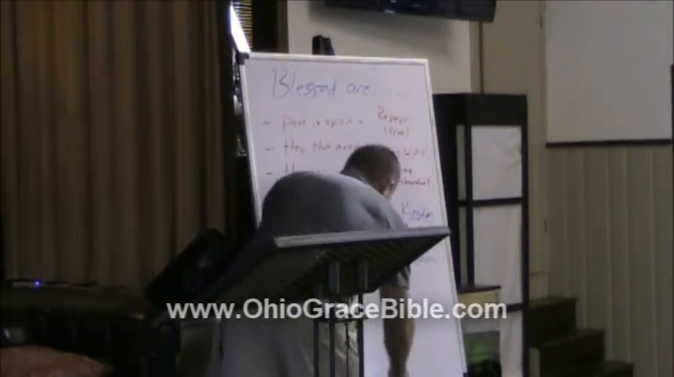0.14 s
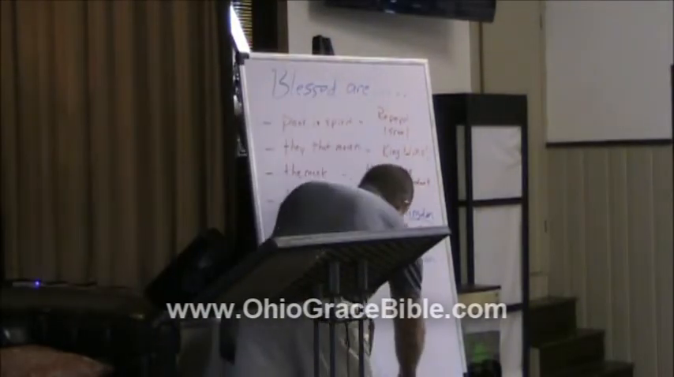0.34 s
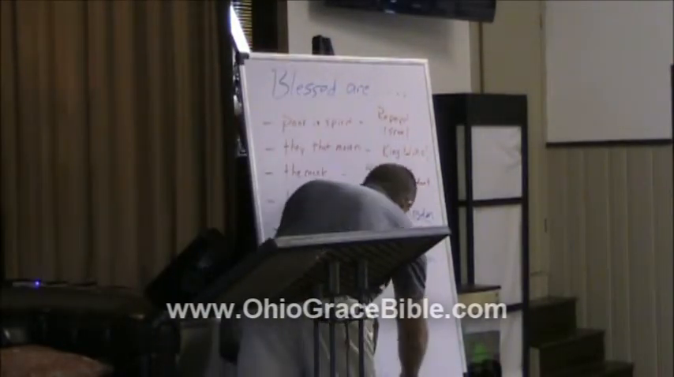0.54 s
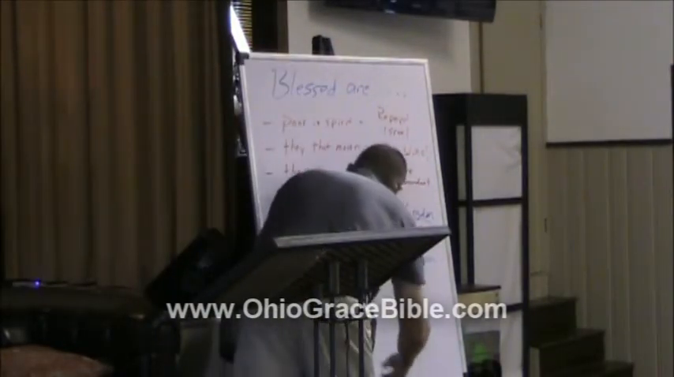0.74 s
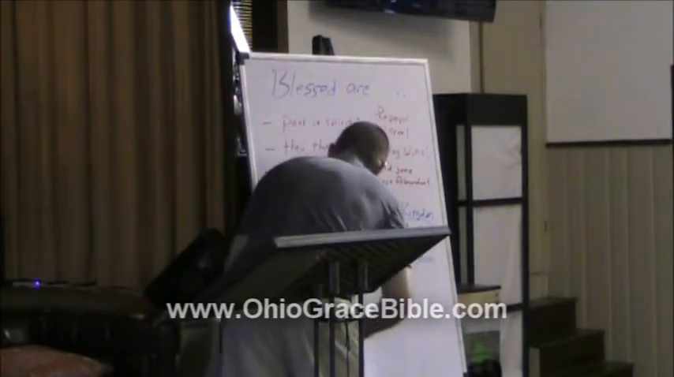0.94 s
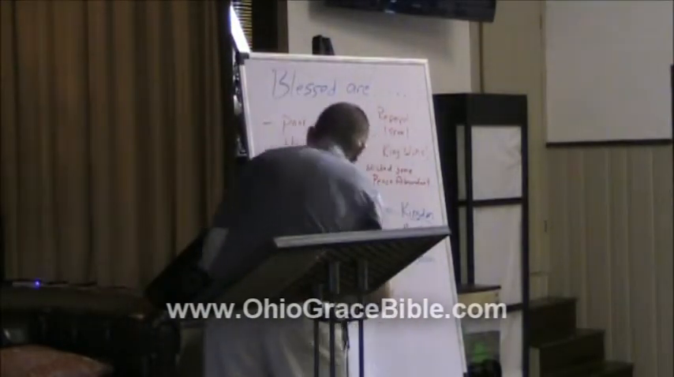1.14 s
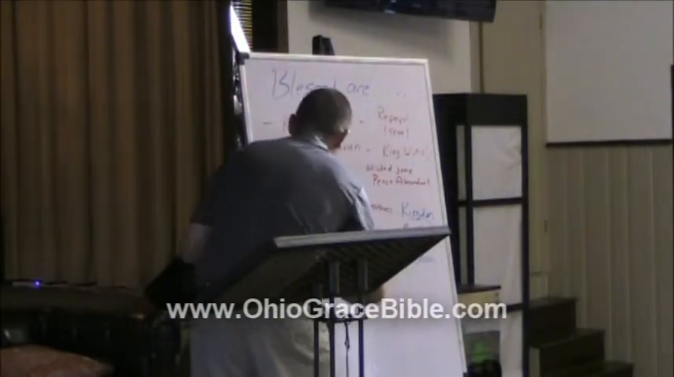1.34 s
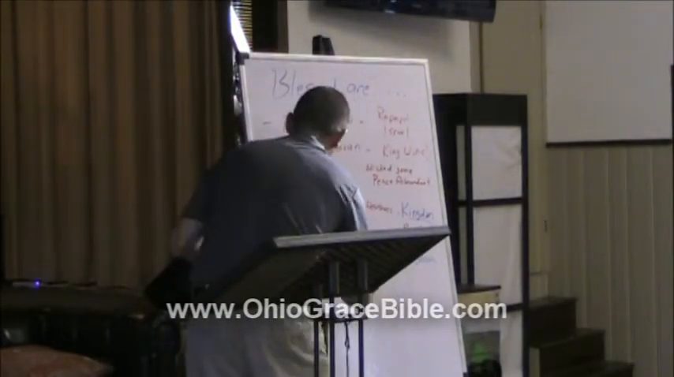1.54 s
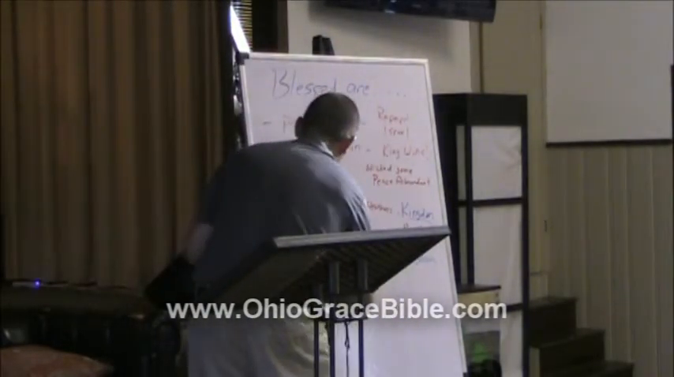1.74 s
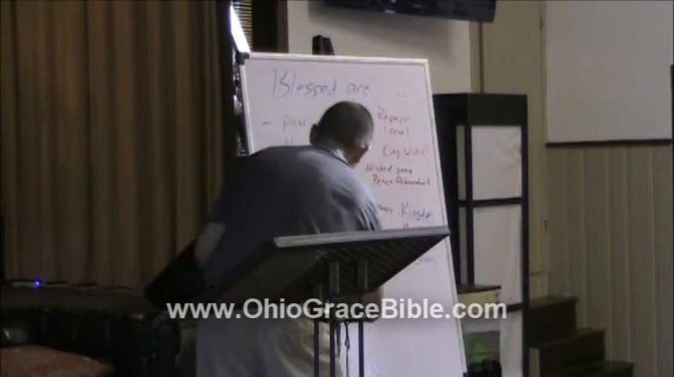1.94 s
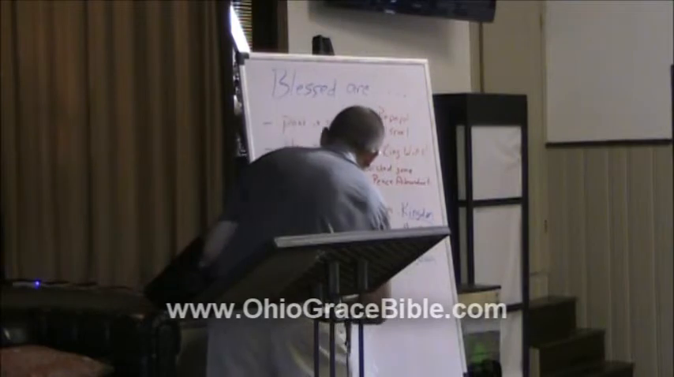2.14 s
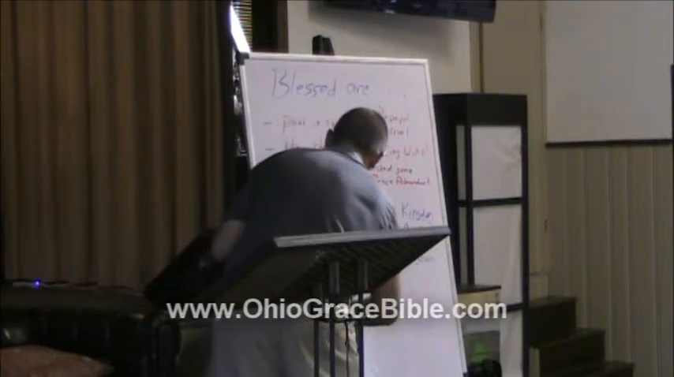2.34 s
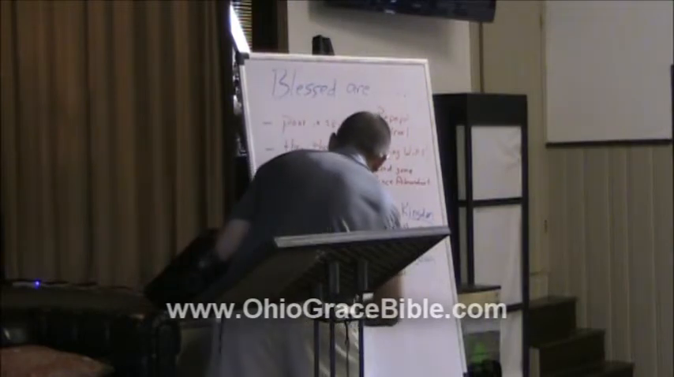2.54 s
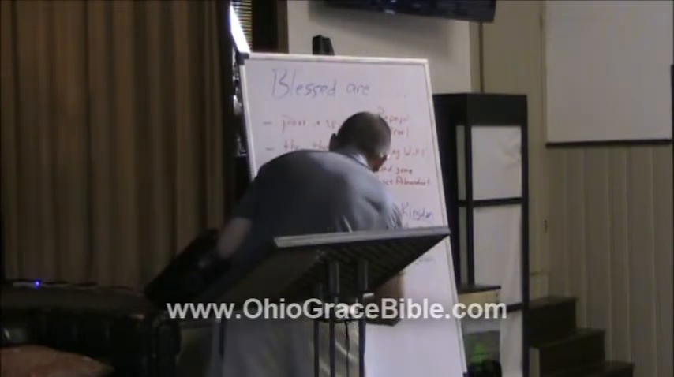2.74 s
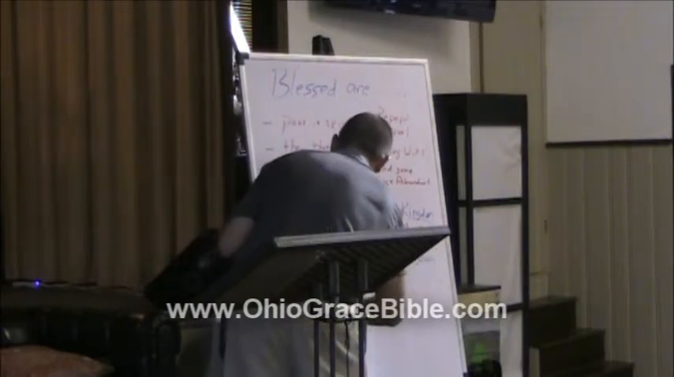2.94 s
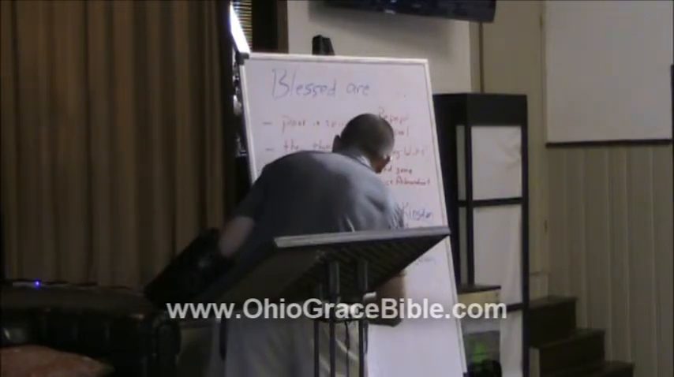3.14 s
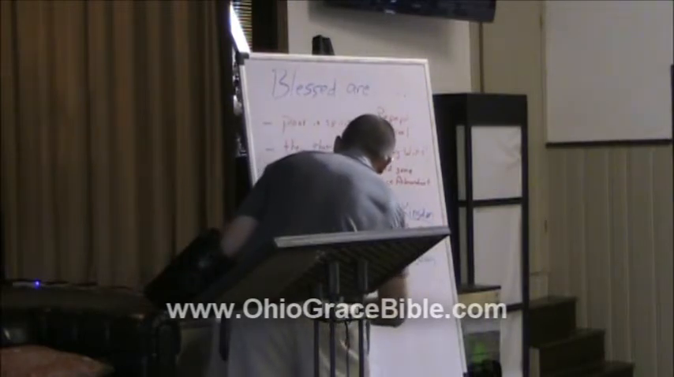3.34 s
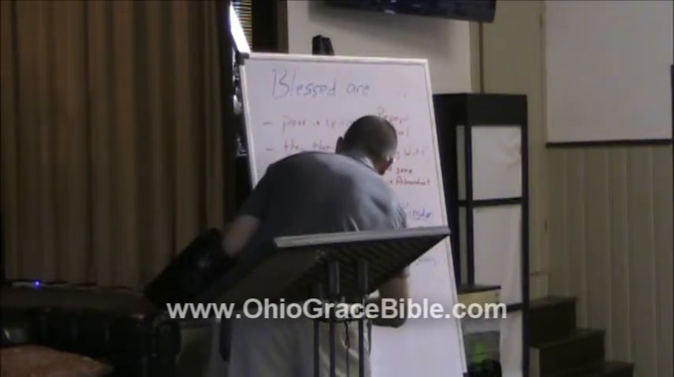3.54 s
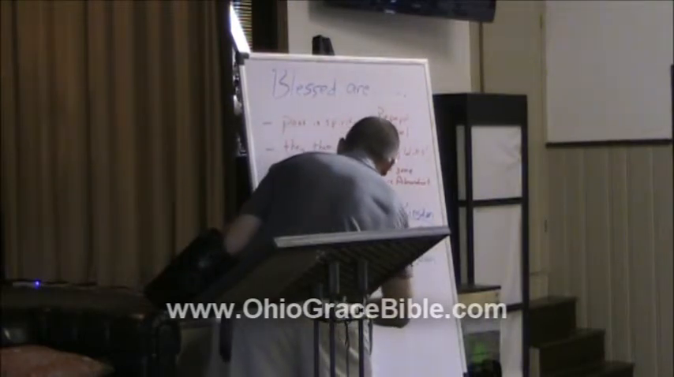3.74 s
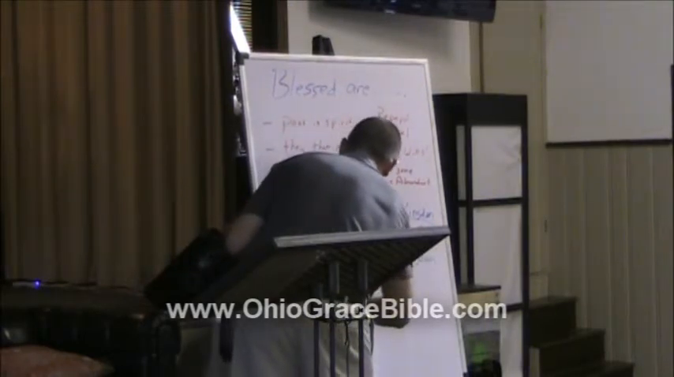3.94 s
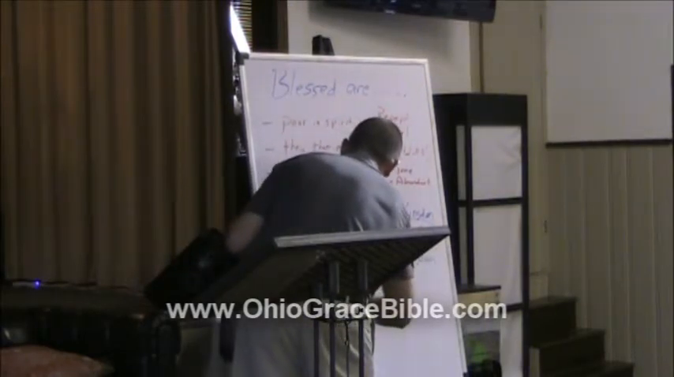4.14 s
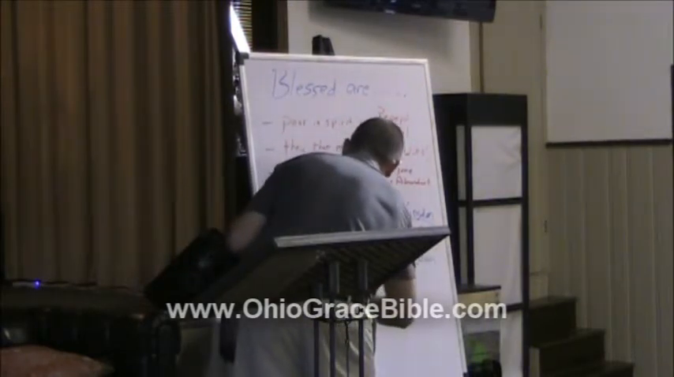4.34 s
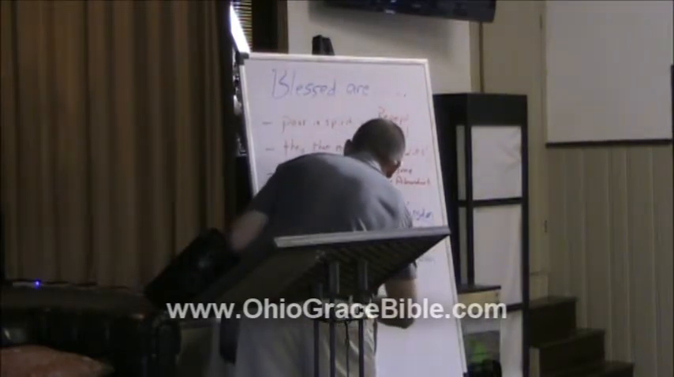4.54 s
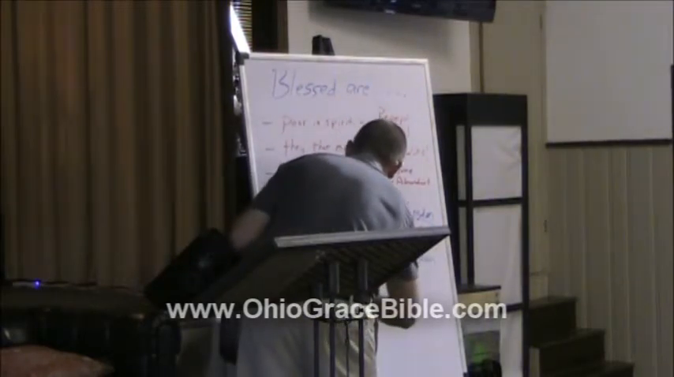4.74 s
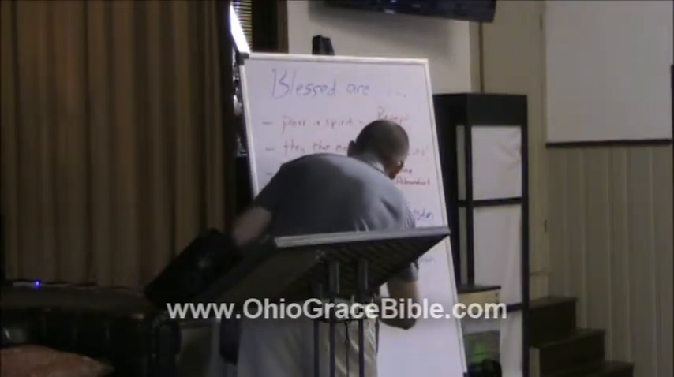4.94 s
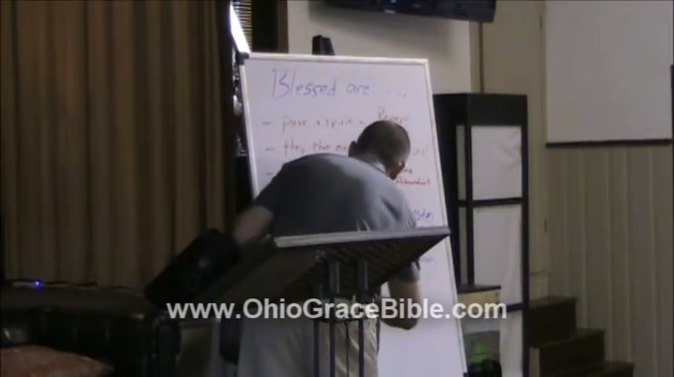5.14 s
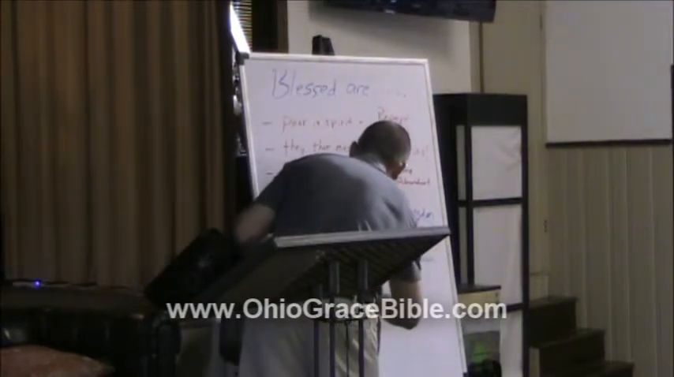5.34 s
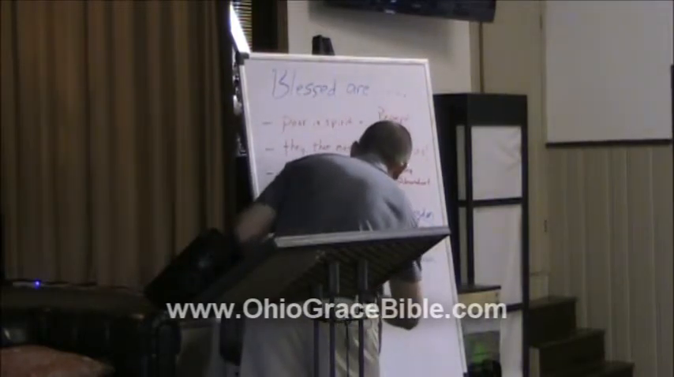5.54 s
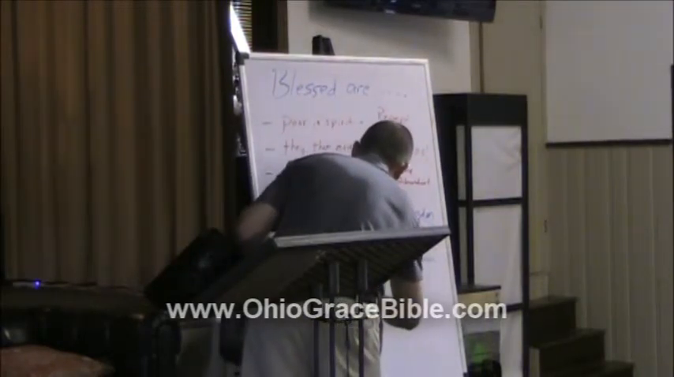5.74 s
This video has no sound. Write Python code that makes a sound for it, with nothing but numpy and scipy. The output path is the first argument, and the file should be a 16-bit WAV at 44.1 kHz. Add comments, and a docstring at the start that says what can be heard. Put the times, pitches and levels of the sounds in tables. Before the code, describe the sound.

A quiet hall with steady, low ventilation rumble and slight hiss, heard through a clip-on microphone close to the writer. At once a very faint, high whistle turns into a dry, bright rasp as a marker finishes a line, peaking around 0.15 s, with a small low microphone bump. Two hard, woody knocks hit the whiteboard at 0.2 and 0.35 s; at 0.45-0.5 s the marker clatters into the tray in a quick cluster, the easel humming briefly and the room answering. A tiny tick comes at 0.85 s, a crisp plastic cap snap at 1.35-1.4 s, then a short rubbing slide near 1.6 s. Lighter raps fall at 2.05 and 2.3 s. From then on writing proceeds: soft dull thumps at about 2.5, 2.8, 3.5, 4.1, 4.5, 5.0 and 5.4 s, the strongest at 5.6 s, among thin, very quiet felt hisses with a faint squeaky edge.

```python
"""In a quiet hall, someone at a whiteboard on an easel is heard from a clip-on microphone.
A marker whistles and rasps along a line by stick-slip, knocks on the board and clatters into the tray:
impacts excite the modes of board and frame. Close by, another is picked up with a tick, its cap snaps off
and slides on the back. Then letters are written: the felt tip lands with soft thumps and hisses by friction.
Ventilation and hum lie beneath; close reflections and a diffuse tail give the space."""
import sys
import numpy as np
from scipy import signal
from scipy.fft import rfft, irfft
from scipy.io import wavfile

SR = 44100
rng = np.random.default_rng(int(sys.argv[2]) if len(sys.argv) > 2 else 0)


def bounce(signal):
    """Save signal as a 16-bit WAV file at the path given by the first command-line argument."""
    frames = np.transpose(np.atleast_2d(signal))
    limited = np.clip(frames, -1, 1)
    pcm = np.round(limited * 32767).astype(np.int16)
    wavfile.write(sys.argv[1], SR, pcm)


N = 259352

# steady background colour: (frequency [Hz], relative level [dB])
FLOOR_COLOUR = [(15, -63), (25, -13), (49, -4), (69, -1.5), (82, -7.5), (119, -2.5), (209, -4), (240, -0.5),
                (495, -7.5), (537, -8), (631, -6.5), (782, -11.5), (1050, -13), (1710, -17.5),
                (15500, -22.5)]
# mains hum and a screen's whine: (frequency [Hz], level [dB])
HUM = [(59.5, -71.5), (120, -77), (15734, -88)]
# rasp of the long line: (frequency [Hz], relative level [dB])
LINE_COLOUR = [(500, -46), (1400, -2), (2000, -3), (3000, -1), (4400, -5.5), (6300, 1.5), (7600, 1),
               (9700, -4.5), (11100, -0.5), (13000, -8), (16000, -1)]
# the nib whistles before it bites: (time [s], pitch [Hz])
WHISTLE = [(0, 9950), (.028, 10650), (.052, 10350), (.062, 9150), (.082, 8750), (.11, 9300)]
# diffuse tail: (band centre [Hz], decay by 60 dB [s], level before weighting by bandwidth [dB])
HALL = [(148, 0.3, 4.5), (284, 0.56, 1.5), (615, 0.5, -16), (1130, 0.91, -9), (2160, 0.77, -11.5),
        (4200, 0.22, -10), (8000, 0.25, -10)]
# hard raps on the board: (time [s], thud peak [dB], crack gain before colouring [dB])
KNOCKS = [(.2160, -26.5, -33.5), (0.3478, -26, -31), (2.0685, -29, -37.5), (2.2964, -28.5, -39.5)]
# a marker clatters into the tray:
# (time [s], thud peak [dB], contact hardness as low-pass corner [Hz], crack gain before colouring [dB])
TRAY = [(.4520, -21.5, 2640, -32.5), (.4768, -30.5, 880, -23.5), (.4795, -29, 514, -39),
        (.4882, -20.5, 1200, -24.5), (.5110, -22, 396, -18)]
# modes of the board: (frequency [Hz], width [Hz], relative level [dB])
BOARD = [(150, 130, -5), (346, 204, 0), (558, 220, 2.5), (811, 120, 5), (1010, 80, 4), (1194, 380, -1.5),
         (1610, 240, -1), (1777, 180, -0.5), (2170, 175, -1.5), (2410, 66, -3.5), (2610, 170, -2.5),
         (3190, 73, 2), (4100, 600, -10.5)]
# modes of the easel's frame, which drone on: (frequency [Hz], width [Hz], gain [dB])
EASEL = [(132, 6.4, 3.5), (164.2, 6.1, 5), (232.3, 3.8, 4.5), (274.4, 11, 6.5), (342, 18, -0.5),
         (382, 6.9, -8), (554, 16, -7), (675, 9.2, 1)]
# reflections from frame, writer and floor: (delay [s], signed share [ratio])
ECHOES = [(.0021, 0.16), (.0046, .25), (.0075, -.25), (0.0101, .2), (0.0137, .13)]
# small plastic clicks: (time [s], gain [dB], ring frequency [Hz], ring width [Hz],
# broad snap relative to the ring [dB], lower edge of the snap [Hz])
CLICKS = [(0.8427, -42.5, 870, 128, -33, 495), (1.3423, -26.5, 8600, 800, 1, 3040),
          (1.3510, -34.5, 8900, 905, 5.5, 3020), (1.4126, -25, 2330, 417, 14, 90)]
# colour of the snap: (frequency [Hz], relative level [dB])
SNAP_COLOUR = [(60, 0), (200, 0), (700, 0), (1200, 3.5), (1700, -1.5), (2400, -1), (3100, -6), (3900, 3),
               (5000, -17), (6800, -7.5), (8600, -5), (11500, -16), (16000, -16.5)]
# short rings in the scrape of each click: (frequency [Hz], width [Hz], relative level [dB])
SCRAPE_RINGS = [(1220, 510, -5), (2500, 260, 0), (3600, 550, -8.5), (8950, 1200, -7.5)]
# the cap is pushed on, one long slide with a shove in it: (middle [s], length [s], level [dB])
SLIDE = [(1.578, 0.17, -55.5), (1.607, 0.027, -54)]
# resonances of the hollow cap: (frequency [Hz], width [Hz], relative level [dB])
CAP_HOLLOW = [(1500, 400, -3.5), (2920, 800, -1), (5920, 530, 4), (8360, 860, -6), (11200, 1100, -2.5)]
# the felt tip lands: (time [s], peak level [dB], quickness of the push [Hz])
LANDINGS = [(2.0439, -33, 340), (2.5274, -25, 327), (2.7782, -33, 260), (3.4666, -31.5, 363),
            (3.8849, -40, 238), (4.1270, -34.5, 209), (4.4666, -32, 244), (5.0085, -29, 376),
            (5.3987, -28.5, 360), (5.5998, -21, 480)]
# firm pen strokes: (middle [s], length [s], hiss level [dB])
STROKES = [(2.091, 0.096, -63), (2.548, .05, -59.5), (2.844, 0.1, -60.5), (3.172, .06, -59),
           (3.28, 0.091, -65), (3.393, 0.03, -68), (3.625, .062, -65), (3.71, .05, -67), (4.03, 0.022, -64),
           (4.216, 0.13, -66.5), (4.42, 0.031, -64.5), (4.496, 0.051, -66.5), (4.605, 0.06, -66),
           (4.687, 0.056, -65.5), (4.767, 0.038, -61.5), (4.838, .07, -67.5), (5.166, .05, -66.5),
           (5.44, .079, -69)]
# the tip's tone drifts along the word:
# (time [s], nib resonance [Hz], nib width [Hz], squeak [Hz], squeak over the hiss [dB])
PEN = [(2.1, 7400, 3000, 11000, -6), (2.7, 6450, 2400, 11000, -7.5), (3.3, 6450, 2760, 10900, -1),
       (4.2, 5530, 5000, 11300, 1), (4.7, 5470, 4600, 10200, 0), (5.5, 5500, 4500, 10400, 3)]
# sends into the easel's frame: (raps [dB], tray [dB], felt tip [dB])
DRONE_DB = (-9.5, 7.5, -8.5)
# sends into the hall: (raps [dB], tray [dB], felt tip [dB], cracks [dB], clicks and cap [dB], rubbing [dB])
HALL_SEND_DB = (9.5, -1.5, -8, -5, -11.5, -21)

T = np.arange(N) / SR
BLOW = 8192  # samples computed for one short sound
QUIET = 1e-18  # tiny offset into the filters
FLOOR_DB = -56
TOP_HZ = 15850
KNOCK_HZ = 1450  # contact hardness of every rap

# a long line: the pen bites, rasps at full speed, then eases off and trails away
LINE_START_S, LINE_ATTACK_S, LINE_HOLD_S, LINE_RELEASE_S = 0.086, 0.067, 0.008, 0.088
LINE_DB = -46.5
TRAIL_S, TRAIL_DB = 0.63, -58.5  # light rubbing under it: half held, half fading
WHISTLE_DB, WHISTLE_FADE_DB_PER_S = -64, 40
WHISTLE_WOBBLE = 0.016  # share of the pitch

# a landing: the hand's weight follows the tip, the panel rings, and the barrel ticks as the stroke sets off
HAND_DB, HAND_HZ, HAND_LAG_S = -8.5, 151, 0.0002
PANEL_HZ, PANEL_WIDTH_HZ, PANEL_DB = 293, 76, -8
TICK_AFTER_S, TICK_S, TICK_HZ, TICK_WIDTH_HZ, TICK_DB = 0.0351, 0.0089, 1400, 1340, -59

# faint joining strokes fill the writing at the hand's own pace
WRITING_S, JOINS_PER_S = (2.9, 5.85), 6
JOIN_S, JOIN_DB, JOIN_SCATTER_DB = 0.06, -70.5, 0.5
SQUEAK_WIDTH_HZ = 3500  # of each of two resonances in cascade


def undb(db):
    """Logarithmic law: decibels to amplitude gain."""
    return 10 ** (np.asarray(db) / 20)


def level(x, db=0):
    """Mean power sets the level: scale to an rms value."""
    return x * undb(db) / np.sqrt(np.mean(x ** 2))


def peak(x, db=0):
    """Greatest excursion sets the level: scale to a peak value."""
    return x * undb(db) / np.abs(x).max()


def add(out, s, x):
    """Superposition: add a short sound at time s."""
    i = max(int(s * SR), 0)
    out[i:i + len(x)] += x[:max(N - i, 0)]


def mix(sounds, dbs):
    """Superposition of sounds, each with its own gain."""
    return sum(undb(db) * x for x, db in zip(sounds, dbs))


def band(x, hz, width):
    """Damped resonance: a single mode with gain 1 at its centre."""
    quality = hz / min(width, SR / 4)
    b, a = signal.iirpeak(min(hz, .45 * SR), quality, SR)
    return signal.lfilter(b, a, x + QUIET)


def ring(x, modes):
    """Modal superposition: neighbouring resonances swing in opposite directions."""
    return sum((-1) ** k * undb(db) * band(x, hz, width) for k, (hz, width, db) in enumerate(modes))


def soften(x, hz, order=2):
    """Low-pass filtering: attenuate what lies above the corner."""
    b, a = signal.butter(order, min(hz, .45 * SR), fs=SR)
    return signal.lfilter(b, a, x + QUIET)


def thin(x, hz):
    """High-pass filtering: attenuate what lies below the corner."""
    b, a = signal.butter(2, min(hz, .45 * SR), "high", fs=SR)
    return signal.lfilter(b, a, x + QUIET)


def colour(x, points):
    """Minimum-phase filtering: a causal response with the given (frequency [Hz], level [dB]) outline."""
    hz, db = np.transpose(points)
    bins = np.maximum(np.arange(BLOW // 2 + 1) * SR / BLOW, 1)
    outline_db = np.interp(np.log(bins), np.log(hz), db)
    cepstrum = irfft(np.log(undb(outline_db)))
    # fold the cepstrum onto positive times, which makes the response causal
    cepstrum[1:BLOW // 2] *= 2
    cepstrum[BLOW // 2 + 1:] = 0
    response = irfft(np.exp(rfft(cepstrum)))
    return signal.fftconvolve(x, response)[:len(x)]


def walk(rate, n=N):
    """Random modulation: normal draws, rate per second, joined by straight lines."""
    at = np.arange(n) * rate / SR
    knots = rng.standard_normal(n // 8)
    return np.interp(at, np.arange(len(knots)), knots)


def friction(n, grain_db=3, catch_db=0.5):
    """Dry friction: dense micro-slips of uneven size, in spurts as the surface catches."""
    unevenness_db = grain_db * walk(2500, n) + catch_db * walk(130, n)
    return level(rng.standard_normal(n) * undb(unevenness_db))


def swell(t, length):
    """Hand kinematics: a movement speeds up and slows down around t = 0."""
    return np.exp(-3.2 * (t / length) ** 2)  # 45 percent at half a length from the middle


def envelope(start, attack, hold, release):
    """Piecewise-linear amplitude: straight rise, hold and fall."""
    return np.interp(T, start + np.cumsum([0, attack, hold, release]), [0, 1, 1, 0])


def floor():
    """Stationary noise and pure tones: ventilation, hum and microphone hiss."""
    air = level(colour(rng.standard_normal(N), FLOOR_COLOUR), FLOOR_DB)
    hum = sum(level(np.sin(2 * np.pi * hz * T + rng.uniform(0, 2 * np.pi)), db) for hz, db in HUM)
    side_colour = [(30, 11), (120, 2.5), (500, -0.5), (3000, -2), (15000, -0.5)]
    side = level(colour(rng.standard_normal(N), side_colour), -64)
    return air + hum + side * np.array([[1], [-1]])  # opposite sign in the two channels


def long_line():
    """Stick-slip: the nib first whistles in regular slips, then breaks into a rasp."""
    times, hz = np.transpose(WHISTLE)
    pitch = np.interp(T, times, hz) * (1 + WHISTLE_WOBBLE * walk(1000))
    tone = level(np.sin(2 * np.pi * np.cumsum(pitch) / SR))
    gliding = np.clip(1 - (T - LINE_START_S) / LINE_ATTACK_S, 0, 1)
    whistle = tone * gliding * undb(WHISTLE_DB - WHISTLE_FADE_DB_PER_S * T)
    bite = undb(LINE_DB) * envelope(LINE_START_S, LINE_ATTACK_S, LINE_HOLD_S, LINE_RELEASE_S)
    trail = undb(TRAIL_DB) * envelope(-LINE_START_S, 2 * LINE_START_S, TRAIL_S / 2, TRAIL_S / 2)
    rasp = level(colour(friction(N, grain_db=3.5, catch_db=2.0), LINE_COLOUR))
    return whistle + rasp * np.hypot(bite, trail)  # powers of bite and trail add


def hall(x):
    """Reverberation: a diffuse tail builds quickly and dies soonest in the treble."""
    t, tail = T[:SR], 0
    for hz, t60, db in HALL:
        noise = level(band(band(rng.standard_normal(SR), hz, hz), hz, hz))
        fade = undb(-60 * t / t60) * (1 - np.exp(-t / 0.005))
        weight = np.sqrt(hz / SR / np.sum(fade ** 2))
        tail = tail + undb(db) * noise * fade * weight
    return signal.fftconvolve(x, tail)[:N]


def mic_bump(s=0.128, hz=55, db=-42):
    """Damped sway: the microphone moves against the shirt as the writer bends."""
    return undb(db) * np.cos(2 * np.pi * hz * (T - s)) * np.exp(-((T - s) / 0.0081) ** 2)


def knocks(rows, crack_s):
    """Impact excitation: a short push rings the board's modes while the barrel cracks; (thuds, cracks)."""
    thuds, cracks, t = np.zeros(N), np.zeros(N), T[:BLOW]
    for s, db, hard_hz, crack_db in rows:
        push = soften(signal.unit_impulse(BLOW), hard_hz, order=1)
        add(thuds, s, peak(ring(push, BOARD), db))
        chatter = rng.standard_normal(BLOW) * np.exp(-t / crack_s) * (1 - np.exp(-t / 0.0008))
        add(cracks, s, undb(crack_db) * chatter)
    crack_colour = [(100, -30), (700, -22), (1500, 8.0), (3000, 2.5), (5000, 0.0), (10000, -2.5), (15000, -11.5)]
    return thuds, colour(cracks, crack_colour)


def nearby(x, echo_db, scatter_db, scatter_s):
    """Early reflection: direct sound, dull close echoes and a short scatter between board and writer."""
    out, dull, t = x.copy(), soften(x, 3800, order=1), T[:BLOW]
    for delay, share in ECHOES:
        add(out, delay, undb(echo_db) * share * dull)
    noise = thin(soften(rng.standard_normal(BLOW), 2400), 260)
    scatter = level(noise * t * np.exp(-t / scatter_s), scatter_db)
    return out + signal.fftconvolve(x, scatter)[:N] / np.sqrt(BLOW)


def clicks(slip_s=0.0013, slip_db=-14):
    """Sudden release: a marker is picked up with a tick, then the cap snaps off; dispersion spreads each."""
    out, push, t = np.zeros(N), signal.unit_impulse(BLOW), T[:BLOW]
    for s, db, hz, width, snap_db, edge_hz in CLICKS:
        tone = band(band(push, hz, width), hz, 4 * width)
        # a brief scrape, as of a lip over its ridge
        slip = rng.standard_normal(BLOW) * t / slip_s * np.exp(-t / slip_s)
        snap = peak(colour(push, SNAP_COLOUR)) + peak(ring(slip, SCRAPE_RINGS), slip_db)
        click = peak(tone) + undb(snap_db) * thin(snap, edge_hz)
        # bending waves spread the click in time and keep its colour (all-pass)
        for bend_hz in (1000, 2500, 4000, 8000, 12000):
            click = click - 2 * band(click, bend_hz, 1260)
        add(out, s, undb(db) * click)
    return out


def cap_slide():
    """Friction-driven resonance: plastic rubs on plastic and sounds the hollow of the cap."""
    speed = sum(undb(db) * swell(T - s, length) for s, length, db in SLIDE)
    return level(ring(friction(N, grain_db=0.5, catch_db=1.9), CAP_HOLLOW)) * speed


def bell(t, hz):
    """Panel radiation: under a bell-shaped push the sound follows the push's curvature."""
    u = (np.pi * hz * t) ** 2
    return (1 - 2 * u) * np.exp(-u)


def landings():
    """Soft impact: felt gives a short push; the weight of the hand follows with a slower one."""
    out, lead = np.zeros(N), 0.01  # seconds of room ahead of the push's middle
    t = T[:BLOW] - lead
    for s, db, hz in LANDINGS:
        push = bell(t, hz) + undb(HAND_DB) * bell(t - HAND_LAG_S, HAND_HZ)
        thump = push + undb(PANEL_DB) * band(push, PANEL_HZ, PANEL_WIDTH_HZ)
        rub = level(band(friction(BLOW), TICK_HZ, TICK_WIDTH_HZ), TICK_DB)
        tick = rub * swell(t - TICK_AFTER_S, TICK_S)
        add(out, s - lead, peak(thump, db) + tick)
    return out


def nib_rub(hz, width):
    """Friction-driven resonance: micro-slips sound one tone of the nib."""
    grains = friction(2 * BLOW, grain_db=3.5, catch_db=3.5)
    return level(band(band(grains, hz, width), hz, width))


def stroke(s, length, db):
    """Speed-controlled friction: the hand's movement shapes the nib's hiss and a squeak above it."""
    times, *tone = np.transpose(PEN)
    nib_hz, width, squeak_hz, squeak_db = (np.interp(s, times, column) for column in tone)
    sound = nib_rub(nib_hz, width) + undb(squeak_db) * nib_rub(squeak_hz, SQUEAK_WIDTH_HZ)
    return undb(db) * swell(T[:2 * BLOW] - BLOW / SR, length) * sound


def strokes():
    """Intermittent friction: firm strokes, with faint ones at loosely even steps among them."""
    out, times = np.zeros(N), np.arange(*WRITING_S, 1 / JOINS_PER_S)
    chance = rng.standard_normal((len(times), 2))
    joins = [(s + JOIN_S * late / 2, JOIN_S, JOIN_DB + JOIN_SCATTER_DB * firm)
             for s, (late, firm) in zip(times, chance)]
    for s, length, db in list(STROKES) + joins:
        add(out, s - BLOW / SR, stroke(s, length, db))
    return out


def scene():
    """Coupling: blows on board and tray shake the easel and fill the hall; clicks and cap are close and dry."""
    background = floor()
    rubbing = long_line() + strokes()
    raps, rap_cracks = knocks([(s, db, KNOCK_HZ, crack_db) for s, db, crack_db in KNOCKS], crack_s=0.0023)
    clatter, tray_cracks = knocks(TRAY, crack_s=0.0032)
    cracks = rap_cracks + tray_cracks
    handling = clicks() + cap_slide()
    soft = landings()
    hard_board = nearby(raps + clatter, echo_db=-1, scatter_db=-13.5, scatter_s=0.005)
    soft_board = nearby(soft, echo_db=-7, scatter_db=-18.5, scatter_s=0.0065)
    drone = ring(mix((raps, clatter, soft), DRONE_DB), EASEL)
    room = hall(mix((raps, clatter, soft, cracks, handling, rubbing), HALL_SEND_DB))
    return hard_board + soft_board + drone + cracks + handling + rubbing + room + mic_bump() + background


def record(dry):
    """Band limitation: a steep elliptic low-pass cuts the top."""
    sos = signal.ellip(10, .1, 70, TOP_HZ, fs=SR, output="sos")
    return signal.sosfilt(sos, dry)


dry = scene()
out = record(dry)
bounce(out)
```